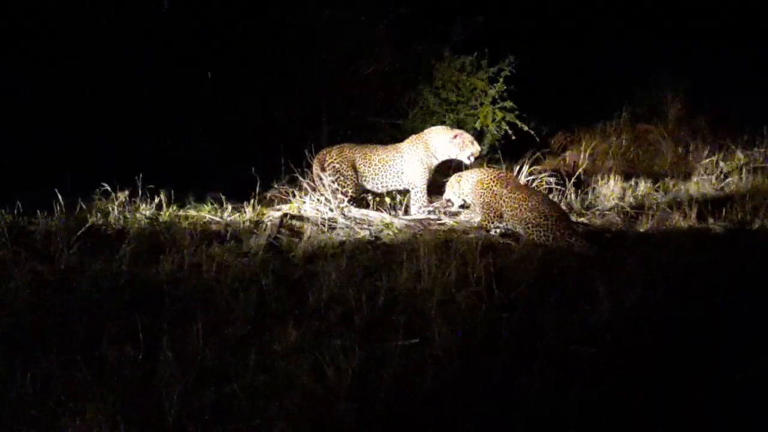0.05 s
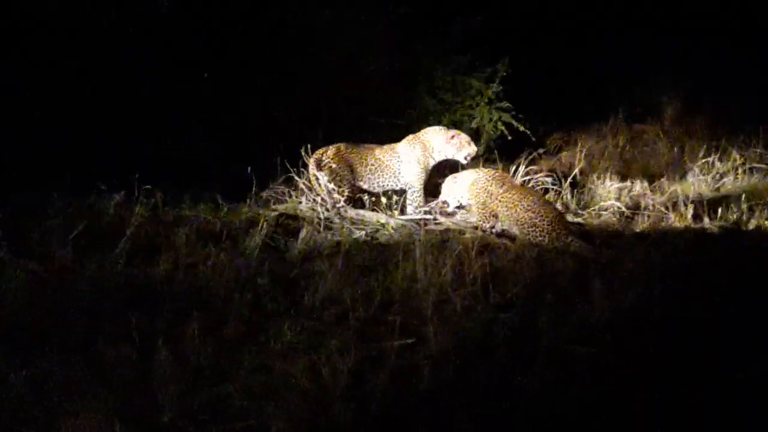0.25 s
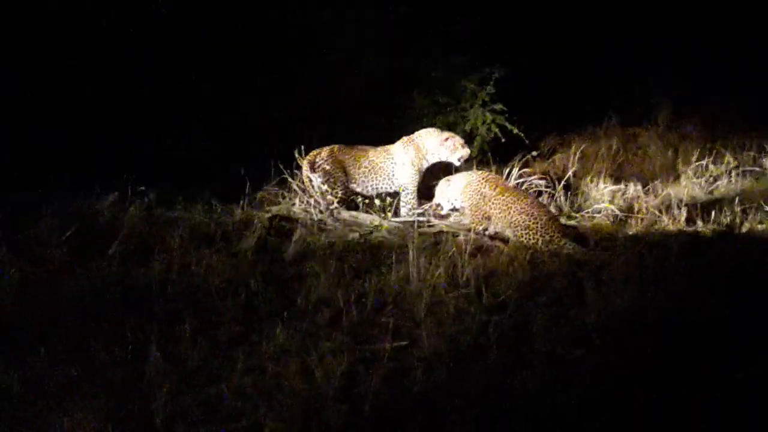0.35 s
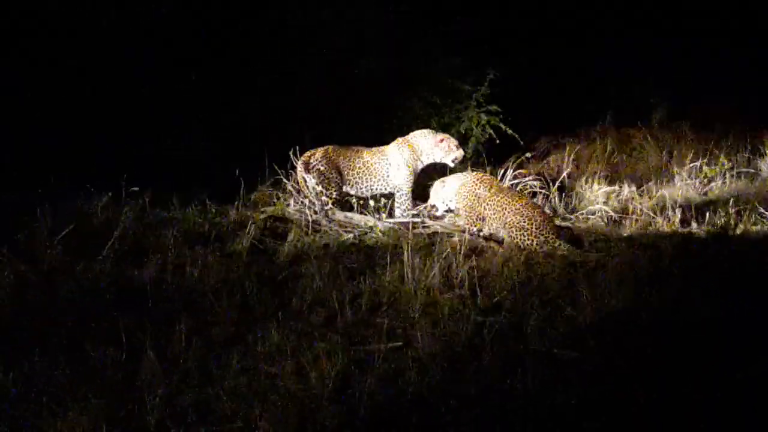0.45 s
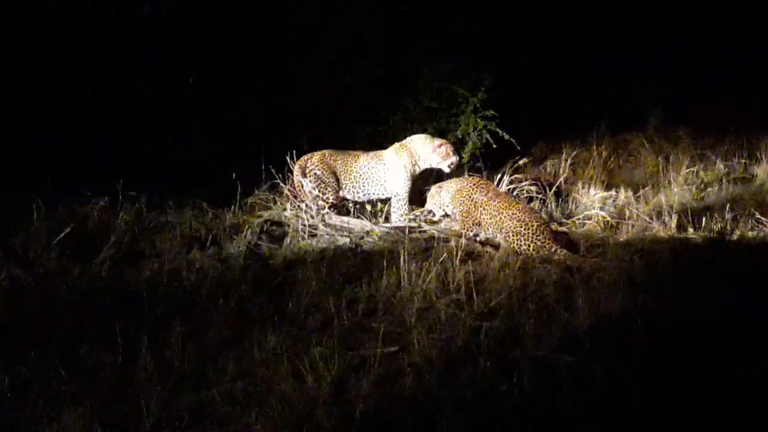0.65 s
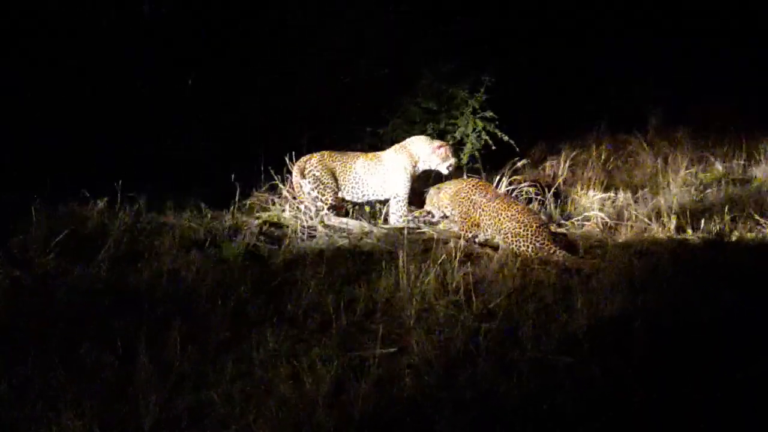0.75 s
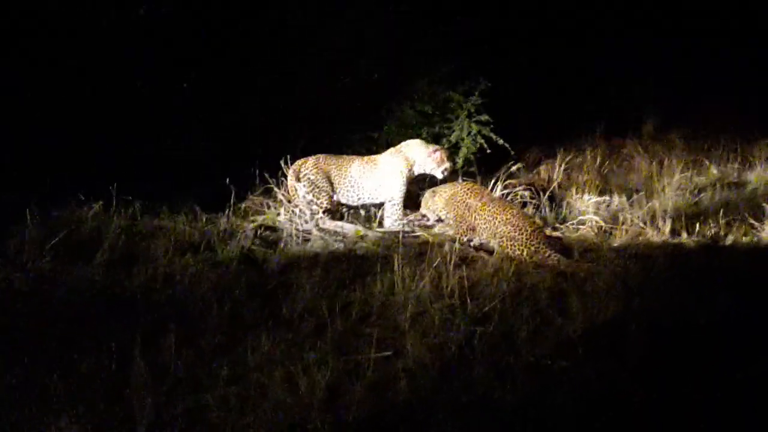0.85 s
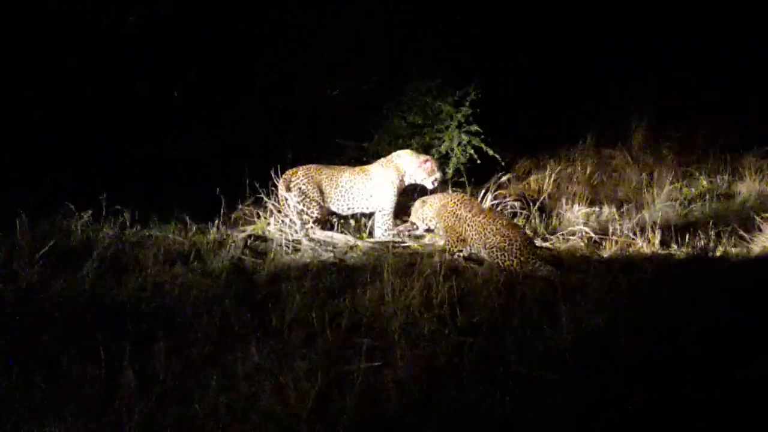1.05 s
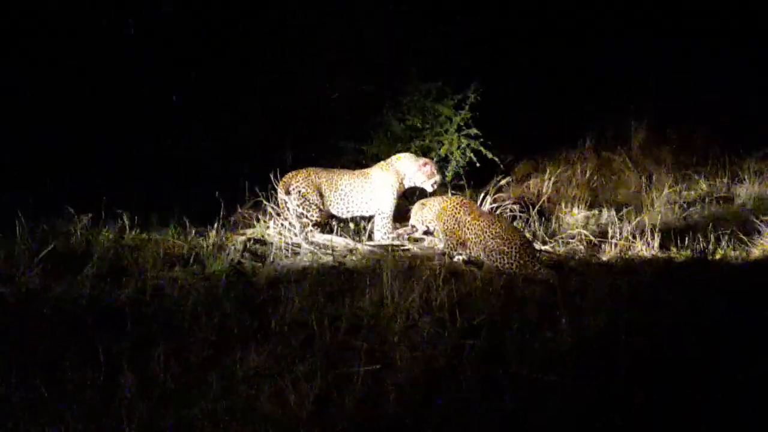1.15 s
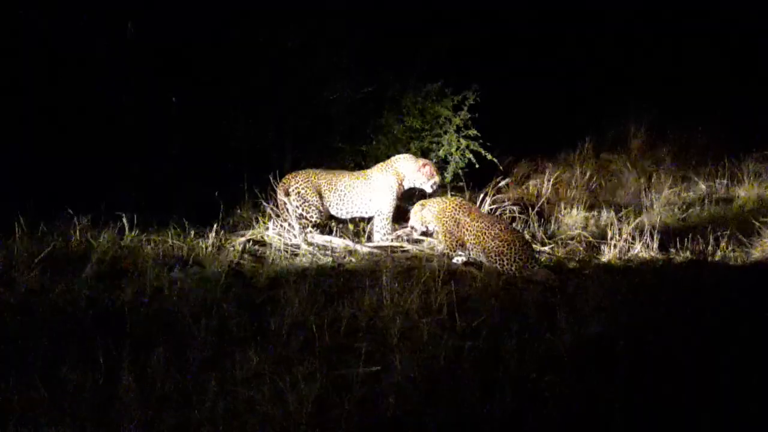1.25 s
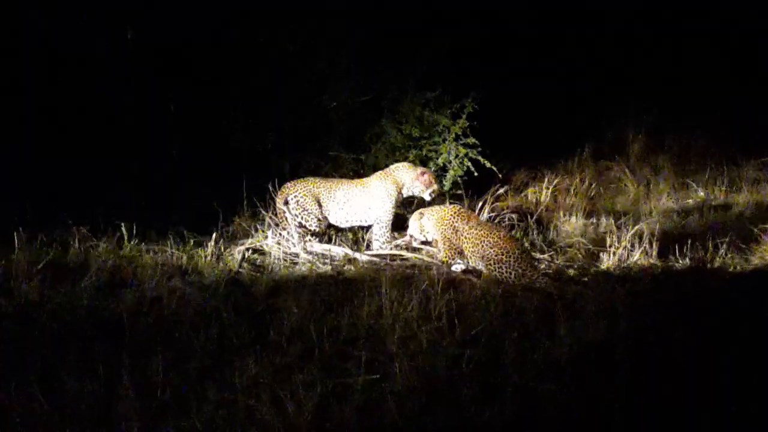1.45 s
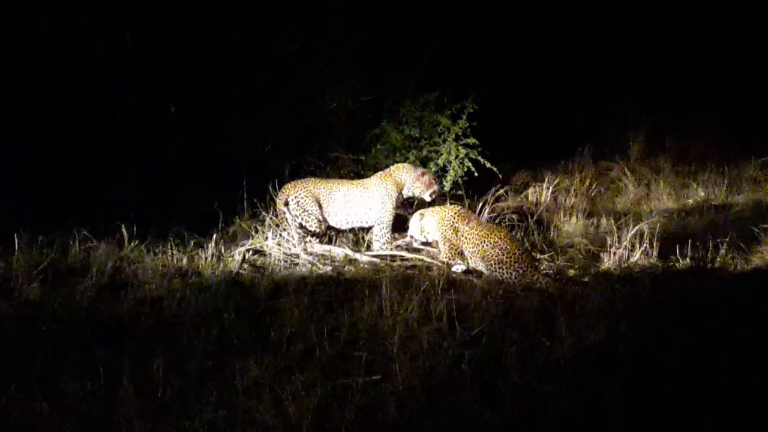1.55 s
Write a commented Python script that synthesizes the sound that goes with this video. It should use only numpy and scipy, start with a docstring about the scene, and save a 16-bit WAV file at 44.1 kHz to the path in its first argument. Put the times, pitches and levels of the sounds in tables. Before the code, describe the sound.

A cricket trills in night grassland, swelling once as dry grass crackles close by.

```python
"""A cricket trills near 5 kHz in grassland at night and swells once to full voice.
Each stroke of its wings makes a short falling note. Dry grass crackles and snaps close by during
the swell, its stalks ringing briefly, and leaves swish twice. Soft knocks, a hollow shuffling and
faint hums sound nearby. Behind it all, far insects blur into a thin band over a low rumble."""
import sys
import numpy as np
from scipy import signal
from scipy.fft import rfft, irfft
from scipy.io import wavfile
from scipy.ndimage import uniform_filter1d

SR = 44100
rng = np.random.default_rng(int(sys.argv[2]) if len(sys.argv) > 2 else 0)


def put_to_file(sound):
    """Save the sound as 16-bit audio at rate SR, in the file named by the first command-line argument."""
    columns = np.atleast_2d(sound).T  # one column per channel
    safe = np.clip(columns, -1, 1)
    whole_steps = np.round(safe * 32767)
    wavfile.write(sys.argv[1], SR, whole_steps.astype(np.int16))


N = 70560
T = np.arange(N) / SR  # time of each sample [s]
HZ = np.fft.rfftfreq(N, 1 / SR)  # the frequencies of a spectrum [Hz]


def cricket():
    """Each wing stroke makes a short falling note; the grass scatters a brief echo."""
    # borders between runs of evenly spaced strokes: (time [s])
    runs = [.007, .1905, .366, .424, .693, .944, 1.378, 1.488, 1.598]
    # course of the trill: (time [s], level [dB], middle pitch [Hz], fall within a stroke [Hz])
    trill = [(0, -57, 4570, 350), (.17, -60, 4420, 400), (.207, -48.5, 4730, 450), (.225, -41.5, 4950, 650),
             (.243, -34.5, 5186, 397), (.278, -30.5, 5190, 248), (.313, -30, 5227, 323),
             (.383, -28, 5250, 390), (.405, -34.5, 5000, 500), (.44, -37.5, 5090, 500),
             (.457, -39, 4780, 660), (.51, -39, 4830, 710), (.576, -36.5, 4766, 680),
             (.593, -55, 4880, 300), (.675, -49, 4970, 300), (.71, -49, 4970, 352), (.735, -61, 4960, 400),
             (.87, -86, 4770, 400), (.925, -61, 5010, 400), (.948, -55, 5010, 400), (1.015, -66, 4930, 400),
             (1.06, -57.5, 5170, 448), (1.11, -61.5, 4750, 350), (1.19, -57, 4610, 400),
             (1.235, -67, 4740, 400), (1.275, -57, 4600, 400), (1.34, -69, 4690, 400),
             (1.396, -59.5, 4700, 397), (1.46, -56, 4690, 400), (1.52, -74, 4700, 400)]
    strokes_per_s, stroke_s = 58, .0098
    jitter_hz, jitter_db, rasp_depth = 21, 1.1, 0.082
    right_db, echo_db, echo_fade_s = -9.5, -11.5, 0.056
    progress = np.arange(0, stroke_s, 1 / SR) / stroke_s  # 0 to 1 through one stroke
    swell = arch(np.interp(progress, [0, 0.52, 1], [0, .5, 1])) ** 0.91  # loudest near the middle
    glide = np.tanh((0.428 - progress) / 0.25)  # the pitch drops fastest a little before that
    times = np.concatenate([np.linspace(start, end, round((end - start) * strokes_per_s), endpoint=False)
                            for start, end in zip(runs, runs[1:])])
    song = np.zeros(N)
    for time, (detune, accent) in zip(times, rng.standard_normal((len(times), 2))):
        db, hz, fall = curve(trill, time)
        note = tone(hz + jitter_hz * detune + fall / 2 * glide)
        rasp = 1 + rasp_depth * wobble(2048, smooth=30)[:len(note)]
        add(song, time - stroke_s / 2, amp(db + jitter_db * accent) * swell * rasp * note)
    scatter = rng.standard_normal((2, N)) * amp(-60 * T / echo_fade_s)
    echoes = signal.fftconvolve(song[None], scatter, axes=1)[:, :N]
    echo = amp(echo_db) * song.std() * np.array([unit(side) for side in echoes])
    return song * amp([[0], [right_db]]) + echo


def grass():
    """Dry stalks snap in quick bursts of noise over a bed of tiny cracks."""
    # snaps: (time [s], level [dB], time to fade by 60 dB [s], woody body [dB], crisp top [dB])
    snaps = [(.2524, -47, .012, 9, -6), (0.2638, -25, 0.018, -9, 0), (.274, -44, 0.038, -2, -4),
             (0.3126, -22, 0.014, -17, -15), (.328, -31.5, 0.019, -4.5, -6), (0.3435, -26.5, 0.026, -4, -3),
             (.364, -32.5, 0.023, 1, 5), (.379, -28, 0.019, -7, 4), (.3874, -49, 0.023, 14, 0),
             (.398, -33.5, 0.021, 6.5, 3), (0.5833, -36.5, 0.024, -30, 3.5), (.699, -58, 0.038, -5, 6),
             (1.412, -51, .012, -8, 0)]
    # crackling between the snaps: (time [s], level [dB])
    crackle = [(.245, -76), (.268, -47.5), (.30, -51.5), (.335, -48.5), (.36, -45.5), (.385, -40.5),
               (.408, -38.5), (.42, -51.5), (.45, -67.5), (.58, -63), (.66, -68.5), (.8, -83)]
    # tone colour of the grass: (frequency [Hz], left [dB], right [dB])
    grass_colour = [(200, -39, -35), (1155, -24.5, -23.5), (1970, -10.5, -18), (2354, -4.5, -5),
                    (3250, -21.5, -13.5), (4050, -0.5, 4.5), (4330, -2, 2), (5280, 4, -6.5), (6200, -5, -6),
                    (6370, -11.5, -28), (7600, -17.5, -25.5), (9600, -28, -23.5), (10760, -17.5, -26),
                    (12340, -32, -34), (13700, -30.5, -29), (16200, -25.5, -41)]
    cracks_per_s, spread_db = 6500, 0.5
    body_hz, top_hz, rise_s = 3200, 7500, 0.00071
    sizes = amp(spread_db * np.minimum(rng.exponential(1, N), 4))
    cracking = rng.random(N) < cracks_per_s / SR
    cracks = unit(sizes * cracking * rng.standard_normal((2, N))) * amp(curve(crackle, T))
    lowpass, highpass = signal.butter(2, body_hz, fs=SR), signal.butter(2, top_hz, "high", fs=SR)
    t = T[:4096]
    for time, db, fade_s, body_db, top_db in snaps:
        noise = rng.standard_normal((2, len(t)))
        body, top = signal.filtfilt(*lowpass, noise), signal.filtfilt(*highpass, noise)
        burst = noise + (amp(body_db) - 1) * body + (amp(top_db) - 1) * top
        add(cracks, time, burst * np.minimum(t / rise_s, 1) * amp(db - 60 * t / fade_s))
    return colour(cracks, spectrum(grass_colour)) + stalk_ring(cracks)


def stalk_ring(cracks):
    """Each crack sets the stalks ringing briefly."""
    # notes of the stalks: (pitch [Hz], level [dB], time to fade by 60 dB [s])
    stalk_notes = [(2040, -16.5, 0.021), (2363, -23, 0.093), (4140, -21, 0.028), (6190, -23, 0.0083)]
    t = T[:4096]
    ring = np.zeros(len(t))
    for hz, db, fade_s in stalk_notes:
        even_energy = np.sqrt(4 * np.log(1000) / fade_s / SR)  # a longer ring gains no extra energy
        ring += even_energy * amp(db - 60 * t / fade_s) * np.sin(2 * np.pi * hz * t)
    return signal.fftconvolve(cracks, ring[None], axes=1)[:, :N]


def leaves():
    """Leaves brush past each other: bright, grainy noise that swells and fades."""
    # swishes: (time [s], length [s], level [dB])
    swishes = [(0.67, 0.051, -65), (1.459, 0.14, -70)]
    # their tone colour: (frequency [Hz], level [dB])
    swish_colour = [(500, -20), (1800, -4), (2700, 3.5), (3800, 3), (5500, 2.5), (7200, -3), (8700, -0.5),
                    (9600, -7), (11000, -1), (13000, -15), (16000, -17)]
    out = np.zeros((2, N))
    for time, length, db in swishes:
        grains = unit(rng.standard_normal((2, N)) * rng.exponential(1, N))
        out += grains * amp(db) * arch((T - time) / length)
    return colour(out, spectrum(swish_colour))


def knocks():
    """Dull taps: each is one fading note with a noisy thud around it."""
    # taps: (time [s], level [dB], pitch [Hz], time to fade by 60 dB [s])
    taps = [(.002, -61.5, 148, 0.3), (.445, -61, 69, 0.19), (.51, -62, 110, 0.063),
            (1.147, -56.5, 156, .05), (1.185, -58.5, 167.6, 0.077), (1.221, -53.5, 170, 0.049),
            (1.3, -56.5, 154.6, 0.11), (1.352, -61, 411, 0.12), (1.413, -60.5, 410, 0.08),
            (1.488, -64.5, 404, 0.071), (1.557, -54.5, 441, 0.03)]
    rise_s, thud_gain = 0.0034, 0.16
    out, t = np.zeros(N), T[:8192]
    for time, db, hz, fade_s in taps:
        thud = unit(signal.lfilter(*signal.butter(2, hz, fs=SR), rng.standard_normal(len(t))))
        loudness = np.minimum(t / rise_s, 1) * amp(db - 60 * np.maximum(t - rise_s, 0) / fade_s)
        add(out, time, loudness * (np.sin(2 * np.pi * hz * t) + thud_gain * thud))
    return out


def shuffle():
    """Soft rubbing sounds hollow because a few narrow bands of it ring louder."""
    # strength of the rubbing: (time [s], level [dB])
    rubbing = [(0, -53), (.06, -62), (.11, -59), (.18, -66.5), (.33, -62.5), (.46, -69.5), (.54, -67.5),
               (.62, -72), (.69, -68.5), (.82, -71.5), (1.02, -77), (1.14, -68), (1.2, -65.5),
               (1.26, -67.5), (1.4, -68.5), (1.6, -75)]
    # its tone colour: (frequency [Hz], level [dB])
    rub_colour = [(20, -35), (45, -6.5), (150, 0.5), (260, -8), (550, -10.5), (900, -12.5), (1400, -15.5),
                  (2000, -21.5), (3300, -15), (7000, -30), (16000, -59)]
    # ringing bands: (frequency [Hz], width [Hz], boost [dB])
    hollow = [(406, 95, 6), (690, 37, 7), (1120.4, 35, 10), (1520, 13, 8.5)]
    peaks = sum(db / (1 + (2 * (HZ - hz) / width) ** 2) for hz, width, db in hollow)
    return colour(wide_noise() * amp(curve(rubbing, T)), spectrum(rub_colour) + peaks)


def hums():
    """Faint hollow tones swell, waver in pitch and fade."""
    # tones: (time [s], length [s], pitch [Hz], level [dB])
    notes = [(0, 0.017, 1134, -52.5), (0, 0.35, 705, -70.5), (1.175, 0.074, 1116, -74),
             (1.253, 0.068, 710, -70.5)]
    waver_hz = 15.4
    out = np.zeros(N)
    for time, length, hz, db in notes:
        pitch = hz + waver_hz * wobble(N, smooth=900)
        out += amp(db) * np.sqrt(arch((T - time) / length)) * tone(pitch)
    return out


def night_air():
    """Low rumble and hiss, in which far insects blur into one slowly swelling band."""
    # tone colour of the air and insects: (frequency [Hz], left [dB], right [dB])
    air_colour = [(20.4, -28, -14.5), (40, -2, -2.5), (70, 11, 10.5), (124, -1, 0.5), (270, -3.5, -5.5),
                  (610, -12, -14), (1260, -14, -12), (2240, -13.5, -13), (3410, -17.5, -18),
                  (3860, -11, -6), (4870, -1.5, -3), (5000, 1, -26), (5760, -6.5, -11.5),
                  (6400, -16.5, -18.5), (10200, -18.5, -19.5), (17100, -19, -20.5)]
    # swelling of the insects' band: (time [s], boost [dB])
    chorus = [(0, 4), (.6, 13), (.85, 0), (1.0, 2.5), (1.2, 6), (1.35, 0), (1.6, 1)]
    air_db, insect_hz, width_hz = -66.5, 4540, 890
    air = amp(air_db) * colour(wide_noise(), spectrum(air_colour))
    insects = irfft(rfft(air) * np.exp(-((HZ - insect_hz) / width_hz) ** 2), N)
    return air + insects * (amp(curve(chorus, T)) - 1)


def wide_noise():
    """Noise that is alike at both ears in the bass and almost unrelated in the treble."""
    # how alike the ears are: (frequency [Hz], likeness [0 to 1])
    likeness = [(30, 1), (100, 0.78), (500, 0.58), (1200, 0.099), (3000, 0), (16000, 0.067)]
    same = spectrum(likeness)[0]
    left, other = rfft(rng.standard_normal((2, N)))
    right = same * left + np.sqrt(1 - same ** 2) * other
    return irfft(np.array([left, right]), N)


def amp(db):
    """Turns decibels into a gain to multiply by."""
    return 10 ** (np.asarray(db) / 20)


def unit(x):
    """Scales a sound to an average power of 1."""
    return x / np.sqrt(np.mean(x ** 2) + 1e-20)


def tone(pitch):
    """A sine wave that follows a changing pitch in Hz."""
    return np.sin(2 * np.pi * np.cumsum(pitch) / SR)


def arch(progress):
    """Rises from 0 to 1 and falls back as progress goes from 0 to 1."""
    return abs(np.sin(np.pi * np.clip(progress, 0, 1)))


def wobble(samples, smooth):
    """A random wander: noise averaged over `smooth` samples."""
    return unit(uniform_filter1d(rng.standard_normal(samples), size=smooth))


def curve(table, at):
    """Reads a table at the given times, joining its rows with straight lines."""
    times, *columns = np.transpose(table)
    return np.array([np.interp(at, times, column) for column in columns])


def spectrum(table):
    """Reads a table at every frequency, giving each octave equal room."""
    hz, *columns = np.transpose(table)
    return np.array([np.interp(np.log(HZ + 1), np.log(hz), column) for column in columns])


def colour(x, db):
    """Makes some frequencies louder and others softer; white noise keeps its power."""
    gain = unit(amp(db))
    log_gain = np.log(np.concatenate([gain, gain[:, -2:0:-1]], axis=1) + 1e-6)
    phase = -signal.hilbert(log_gain).imag[:, :len(HZ)]  # ringing comes after a click, never before
    return irfft(rfft(x) * gain * np.exp(1j * phase), N)


def add(mix, time, sound):
    """Mixes a sound in at a time in seconds."""
    part = mix[..., max(round(time * SR), 0):][..., :sound.shape[-1]]
    part += sound[..., :part.shape[-1]]


def scene():
    """All the sources together, left and right."""
    return cricket() + grass() + leaves() + night_air() + shuffle() + hums() + knocks()


def record(dry):
    """Cuts away the very highest treble."""
    cutoff_hz = 15900
    lowpass = signal.firwin(511, cutoff_hz, window=("kaiser", 9), fs=SR)
    return signal.oaconvolve(dry, lowpass[None], "same")


dry = scene()
out = record(dry)
put_to_file(out)
```